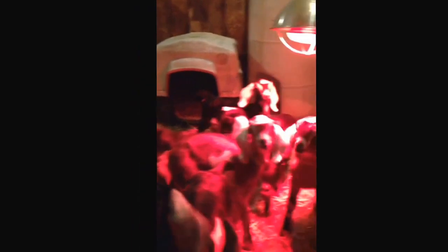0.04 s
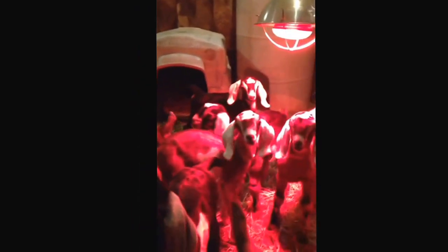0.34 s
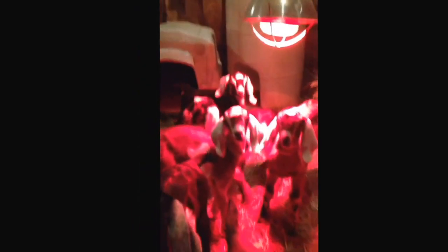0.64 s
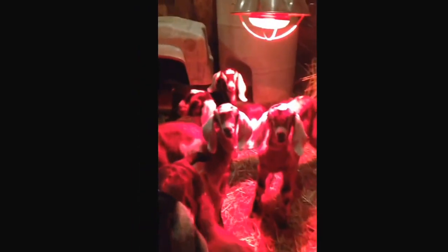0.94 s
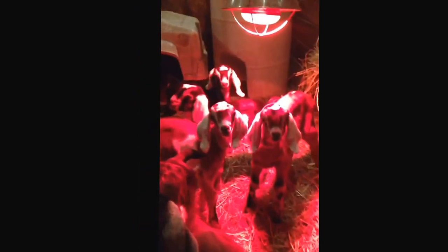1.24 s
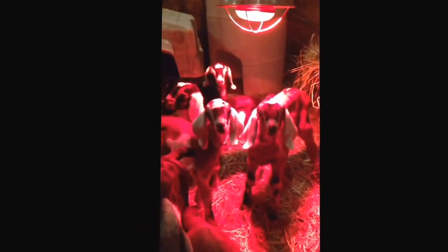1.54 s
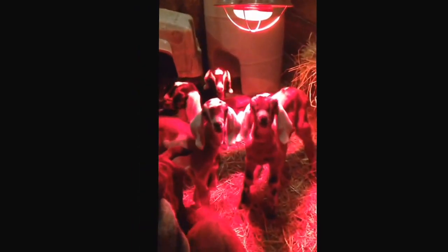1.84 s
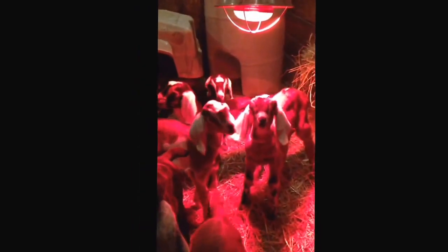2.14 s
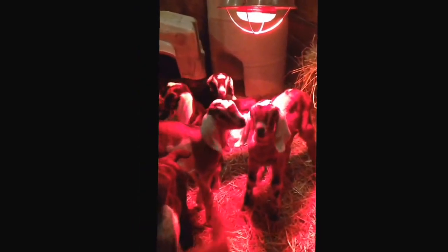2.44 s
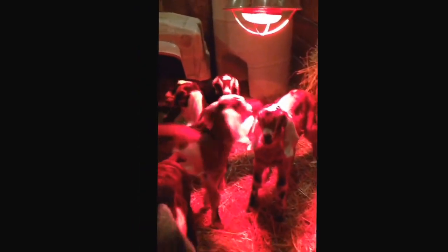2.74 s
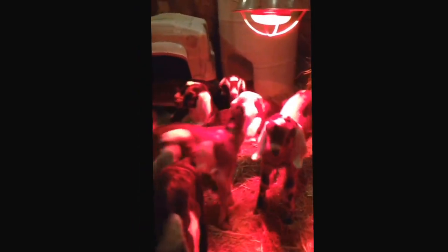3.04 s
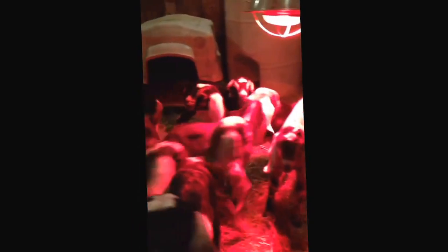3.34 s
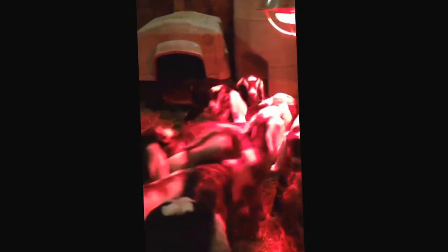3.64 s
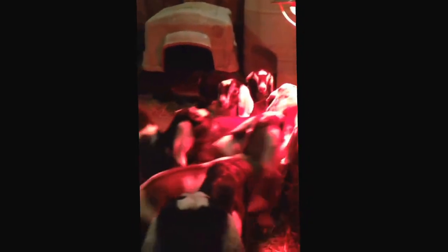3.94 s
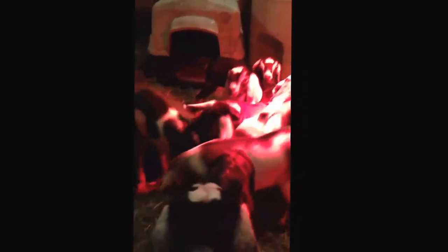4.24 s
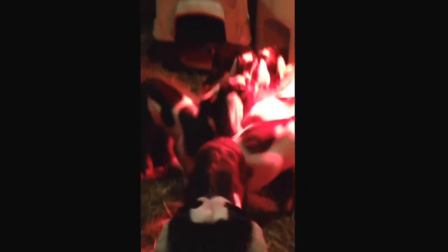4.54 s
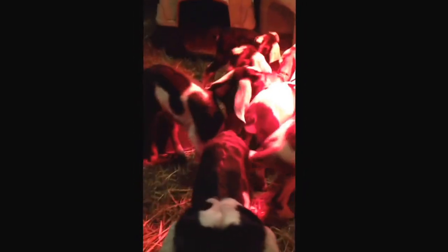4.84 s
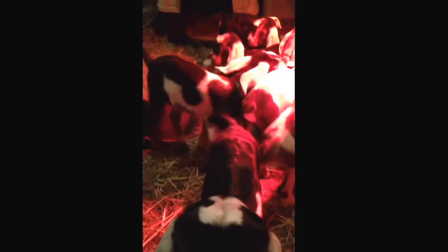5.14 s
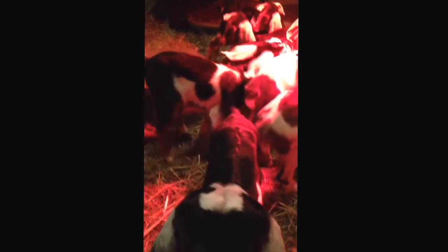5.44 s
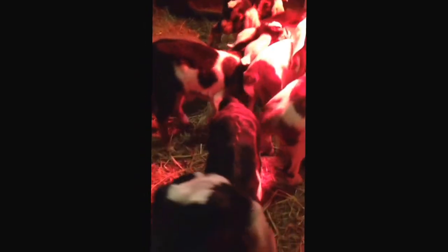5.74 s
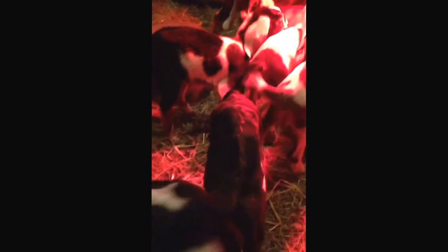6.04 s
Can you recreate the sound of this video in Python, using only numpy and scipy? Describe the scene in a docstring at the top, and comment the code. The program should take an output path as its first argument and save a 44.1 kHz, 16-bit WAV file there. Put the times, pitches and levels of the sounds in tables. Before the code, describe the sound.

After a brief knock, a young goat bleats close by, then another answers more quietly and hoarsely over faint straw rustle.

```python
"""Two goat kids bleat in a small wooden pen bedded with straw, one close by, then one further back.
By the source-filter principle, pulses of the vocal folds excite the resonances of throat and nose.
Each bleat is a chain of throbs in which the pitch sags, crests and drops while the mouth opens.
Knocks, ticks, low thuds and one soft grunt-like sound die away as damped resonances.
Soft steps fall at random, and the straw rustles over a low rumble."""
import sys
import numpy as np
from scipy import signal
from scipy.fft import rfft, irfft
from scipy.io import wavfile
from scipy.ndimage import uniform_filter1d

SR = 44100
rng = np.random.default_rng(int(sys.argv[2]) if len(sys.argv) > 2 else 0)


def dump_mix(stems):
    """Bounce the given channels to the path in sys.argv[1] as a 16-bit WAV at rate SR."""
    frames = np.atleast_2d(stems).T  # one column per channel
    limited = np.clip(frames, -1, 1)  # hard clip at full scale
    pcm = np.round(limited * 32767).astype(np.int16)
    wavfile.write(sys.argv[1], SR, pcm)


N = 268128

# Knocks, ticks and low thuds in the pen, and a soft low grunt-like sound near 4.7 s:
# start_s, level_db, pitch_hz, t60_s
PEN_SOUNDS = [ (0, -38, 175, 0.23), (.01, -48.5, 66, 0.71), (0, -31.5, 543, 0.19), (.038, -35.5, 785, 0.11),
              (.056, -38.5, 434, 0.22), (.087, -51, 122, 0.88), (1.835, -63.5, 400, 0.23),
              (2.828, -54.5, 1280, .025), (3.098, -55.5, 2104, 0.023), (3.509, -52.5, 100.7, 0.12),
              (3.735, -61, 340, 0.38), (3.877, -53, 324, 1), (3.881, -60, 1410, 0.54),
              (4.662, -49.5, 262.2, 0.22), (4.714, -52, 85.4, 0.18), (4.773, -53, 87, 0.162),
              (4.84, -54.5, 121, 0.99), (4.919, -61, 597, .12), (5.135, -54, 526, 0.17),
              (5.138, -52.5, 283, 0.55), (5.156, -52.5, 151, 0.36)]
# Noise spectra of crushed bedding, rumble and rustling straw: frequency_hz, relative_density_db
SCUFF_SPECTRUM = [(60, -10.5), (150, -1.5), (450, 1), (820, -3), (1150, -11), (2200, -16.5), (3500, -28.5),
                  (8000, -39.5), (15000, -53)]
RUMBLE_SPECTRUM = [(20, -20), (45, -3), (80, 0.5), (140, -6), (260, -10.5), (600, -15.5), (1500, -23),
                   (4000, -26.5), (8000, -27.5), (15000, -34)]
STRAW_SPECTRUM = [(530, -35.5), (900, -4.5), (1040, -3.5), (1590, -3), (2520, -1), (3520, -3), (5930, -2.5),
                  (13100, -4), (15300, -2.5)]
# Envelope of the rustle: time_s, relative_level_db
STRAW_ENVELOPE = [(0.0, -78.5), (0.13, -61), (0.17, -73), (0.52, -80), (0.66, -72.5), (1.47, -78),
                  (2.24, -76), (2.39, -89.5), (2.56, -71), (2.68, -81.5), (2.76, -67.5), (2.88, -76.5),
                  (3.74, -73), (3.77, -76.5), (4.42, -70), (4.47, -75.5), (5.86, -79), (6.08, -89)]
# Throbs of each bleat: centre_s, peak_db, fall_db, crest_hz, drop_hz, opening_fraction
NEAR_BLEAT = [ (0.742, -35.5, 18, 419, 395.5, 0.04), (0.842, -36.5, 5.5, 545.4, 495.7, .15),
              (.945, -35, 3.5, 567, 519.7, 0), (1.041, -18, 10.5, 579.5, 525.4, .95),
              (1.146, -20, 10, 580, 529.7, 0.8), (1.249, -21, 10, 589.2, 519, .85),
              (1.355, -21.5, 14, 579.2, 456, 0.8), (1.473, -22, 14, 572.7, 424.5, 0.8)]
FAR_BLEAT = [ (4.150, -49, 17, 515, 489.6, 0.068), (4.249, -43, 16, 540.5, 490, 0.095),
             (4.350, -41, 10.2, 537.2, 458.2, 0.025), (4.463, -35, 5.2, 547.2, 454.8, 0.34),
             (4.581, -35.5, 6.5, 567, 445.6, .75)]
# Pitch contour about a throb's centre: lead_in_s, sag_s, crest_s, crest_end_s, drop_s, drop_end_s
PITCH_OFFSETS = [-.040, -.020, .002, .010, .028, .043]
# Rasp contour about a throb's centre: start_s, full_s, easing_s, end_s
RASP_OFFSETS = [.004, .016, .03, .055]
# Level contour about a throb's centre: lead_in_s, peak_start_s, peak_end_s, trail_s, trough_s
LEVEL_OFFSETS = [-0.041, -0.0098, .013, 0.031, .052]
# Opening pitch scoop, timed from the first throb's centre: start_s, end_s
SCOOP_OFFSETS = [-.040, -.015]
# Formants of throat and nose: centre_hz, bandwidth_hz, shut_gain_db, open_gain_db
NEAR_FORMANTS = [(444.6, 430, 0.5, -5.5), (810, 230, -6.5, -27), (1073, 260, -8, 2), (1430, 310, -29, 3.5),
                 (1710, 330, -11.5, -5), (2260, 240, -8, 0), (2788, 85, -22, -24.5), (3455, 410, -11, -13),
                 (4477, 320, -25.5, -8), (5130, 670, -11, -11.5), (5720, 600, -27.5, -11.5),
                 (6400, 700, -48, -18.5), (7200, 770, -35.5, -20), (8770, 800, -39.5, -29),
                 (10135, 1000, -46.5, -35)]
FAR_FORMANTS = [(472.6, 200, 1, -12), (1030, 220, -0.5, 4.5), (1426, 390, -22.5, 2.5),
                (2280, 510, -18, -2.5), (2990, 230, -28.5, -11), (3380, 270, -11, -6),
                (3802, 360, -6.5, -21), (4360, 260, -10.5, 3), (5050, 570, -13, -19.5),
                (5573, 580, -20.5, -7.5), (6550, 750, -32.5, -16.5), (8650, 1400, -37.5, -28.5)]

TOP_HZ = 15400


def undb(db):
    """Amplitude ratio: a factor of ten for every 20 dB."""
    return np.exp(np.asarray(db) * (np.log(10) / 20))


def unit(x):
    """Normalisation to an rms of 1."""
    return x / np.sqrt(np.mean(x ** 2))


def decay(t, t60):
    """Exponential damping: 60 dB in t60 seconds."""
    return np.exp(-np.log(1000) * t / t60)


def curve(times, values, smooth_s=0.014):
    """Linear interpolation, its corners rounded by a moving average."""
    line = np.interp(np.arange(N) / SR, np.ravel(times), np.ravel(values))
    return uniform_filter1d(line, max(1, int(smooth_s * SR)))


def drift(rate_hz):
    """Random modulation of rms 1, interpolated between Gaussian values."""
    knots = rng.standard_normal(int(N / SR * rate_hz) + 2)
    return unit(np.interp(np.arange(N) / SR * rate_hz, np.arange(len(knots)), knots))


def frequencies(size=4096):
    """Fourier frequency grid on which filter gains are given."""
    return np.maximum(np.arange(size // 2 + 1) * SR / size, 1)


def shape(x, gain):
    """Minimum-phase filtering: folding the cepstrum makes the response causal."""
    cepstrum = irfft(np.log(gain + 1e-6))
    half = len(cepstrum) // 2
    cepstrum[1:half] *= 2
    cepstrum[half + 1:] = 0
    response = irfft(np.exp(rfft(cepstrum)))[:half]
    return signal.fftconvolve(x, response)[:len(x)]


def resonance(hz, width_hz):
    """Lorentzian gain curve of a resonance."""
    return 1 / (1 + (2 * (frequencies() - hz) / width_hz) ** 2)


def noise(spectrum):
    """Spectral shaping of white noise, scaled to rms 1."""
    hz, db = np.transpose(spectrum)
    gain = undb(np.interp(np.log(frequencies()), np.log(hz), db))
    return unit(shape(rng.standard_normal(N), gain))


def band(x, hz, kind, order=2):
    """Zero-phase low-pass or high-pass filtering."""
    return signal.sosfiltfilt(signal.butter(order, min(hz, .45 * SR), kind, fs=SR, output="sos"), x)


def damped_bursts(events, rise_s=0.0019, relative_width=0.47, scuff_hz=637):
    """Damped resonance: each knock, tick, thud or grunt-like sound is a noise band with a scuff."""
    out = np.zeros(N + SR)
    scuff = np.pad(noise(SCUFF_SPECTRUM) * undb(1.55 * drift(180)), (0, SR))
    t = np.arange(SR // 2) / SR
    for start_s, level_db, pitch_hz, t60_s in events:
        start = max(0, int(start_s * SR))
        span = slice(start, start + len(t))
        envelope = np.minimum(t / rise_s, 1) * decay(t, t60_s)
        ringing = shape(rng.standard_normal(SR), resonance(pitch_hz, relative_width * pitch_hz))
        burst = ringing[-len(t):] * envelope
        burst *= np.std(envelope) / np.std(burst)
        scuff_db = -4.5 - 3 * abs(np.log2(pitch_hz / scuff_hz))  # deep thuds and sharp ticks scuff least
        out[span] += undb(level_db) * (burst + undb(scuff_db) * envelope * scuff[span])
    return out[:N]


def soft_steps(count=18, loudest_db=-65, spread_db=6.5, centre_hz=230, t60_s=.25):
    """A random point process: soft hoof steps, as rows like those of PEN_SOUNDS."""
    when, softness, pitch = rng.random((count, 3)).T
    pitch_hz = centre_hz * 2 ** (2 * pitch - 1)
    return np.c_[when * (N - 1) / SR, loudest_db - spread_db * softness, pitch_hz, np.full(count, t60_s)]


def rumble(level_db=-68.5):
    """Low-frequency noise under slight amplitude modulation."""
    return noise(RUMBLE_SPECTRUM) * undb(level_db + 0.57 * drift(12))


def straw_rustle(gain_db=9.5, flicker_db=1.9):
    """Amplitude-modulated broadband noise: the hiss of the straw swells, sinks and flickers."""
    swell_db = curve(*np.transpose(STRAW_ENVELOPE)) + gain_db
    return noise(STRAW_SPECTRUM) * undb(swell_db + flicker_db * drift(300))


def throb_pitch(throbs, lead_in, sag, scoop, slack_hz=510.7):
    """Frequency modulation: each throb sags, crests and drops; the call scoops in from below."""
    centre_s, _, _, crest_hz, drop_hz, _ = np.transpose(throbs)
    end_hz = drop_hz * np.minimum(drop_hz / slack_hz, 1.02)  # slack folds keep sinking
    contour_hz = np.c_[np.outer(crest_hz, [lead_in, sag, 1, .993]), drop_hz, end_hz]
    pitch_hz = curve(centre_s[:, None] + PITCH_OFFSETS, contour_hz)
    return pitch_hz * curve(centre_s[0] + SCOOP_OFFSETS, [1 - scoop, 1])


def throb_rasp(throbs, hoarseness):
    """Loss of tension: the deeper the pitch drops, the slacker the folds and the harsher the throb."""
    centre_s, _, _, crest_hz, drop_hz, _ = np.transpose(throbs)
    slack = np.maximum(1 - drop_hz / crest_hz, 0) ** .8
    return curve(centre_s[:, None] + RASP_OFFSETS, np.outer(hoarseness * slack, [0, 1, 1, 0]))


def throb_level(throbs, least_swell_db, period_s=0.1, fade_db_per_s=452.5, onset_db=-56.5, dip_db=2):
    """Amplitude modulation in dB: the later a throb comes, the further the voice has faded."""
    centre_s, peak_db, fall_db = np.transpose(throbs)[:3]
    trail_db = peak_db - fall_db
    faded_db = trail_db[:-1] - fade_db_per_s * (np.diff(centre_s) - period_s)
    lead_db = np.minimum(np.r_[onset_db, faded_db], peak_db - least_swell_db)
    trough_db = np.minimum(trail_db, np.r_[lead_db[1:], onset_db]) - dip_db
    times = np.ravel(centre_s[:, None] + LEVEL_OFFSETS)
    levels = np.c_[lead_db, peak_db, peak_db, trail_db, trough_db].ravel()
    return curve(np.r_[centre_s[0] - .06, times, centre_s[-1] + .09], np.r_[-120, levels, -120])


def larynx(pitch_hz, rasp, jitter, rasp_jitter, flutter_db, blur_rad, air, rasp_air, air_hz):
    """Glottal source: harmonic pulses with a puff of air each cycle; slack folds beat unevenly."""
    wobble = (jitter + rasp_jitter * rasp ** 2) * drift(450)
    phase = 2 * np.pi * np.cumsum(pitch_hz * (1 + wobble)) / SR
    pulses = 0
    for k in range(1, 25):
        unrest = min(k / 7, 1)  # the changing pulse shape disturbs the upper partials most
        partial = np.cos(k * phase + blur_rad * unrest * drift(30)) * (k * pitch_hz < TOP_HZ)
        pulses += partial * undb(flutter_db * unrest * drift(110))
    puffs = (1 + np.cos(phase)) * band(rng.standard_normal(N), air_hz, "high", order=1)
    return unit(pulses) + (air + rasp_air * rasp) * unit(puffs)


def vocal_tract(source, rasp, throbs, formants, gape=1.5):
    """Formant filtering: the opening mouth turns a nasal hum into a bright vowel, and gapes in a rasp."""
    centre_s, *_, mouth = np.transpose(throbs)
    hum = shape(source, sum(undb(db) * resonance(hz, width) for hz, width, db, _ in formants))
    vowel = shape(source, sum(undb(db) * resonance(hz, width) for hz, width, _, db in formants))
    opening = curve(centre_s[:, None] + [-.011, .052], np.repeat(mouth, 2))
    opening = np.clip(opening * (1 + gape * rasp), 0, 1)
    return (1 - opening) * hum + opening * vowel


def voice_colour(voice, throbs, brighten_db_per_s, pinch_treble_db, pinch_bass_db):
    """Spectral tilt at constant power: the call brightens as it goes and is pinched between throbs."""
    centre_s = np.transpose(throbs)[0]
    pinch_times = np.ravel(centre_s[:, None] + [-.04, 0, .034])
    pinch = curve(pinch_times[1:], np.tile([1, 0, 1], len(centre_s))[1:], smooth_s=0.017)
    brighten_db = curve(centre_s, brighten_db_per_s * (centre_s - centre_s.mean()))
    treble_change = (undb(brighten_db + pinch_treble_db * pinch) - 1) * band(voice, 1800, "high")
    bass_change = (undb(pinch_bass_db * pinch) - 1) * band(voice, 600, "low", order=4)
    voice = voice + treble_change + bass_change
    power = uniform_filter1d(uniform_filter1d(voice ** 2, SR // 200), SR // 200)
    return voice / np.sqrt(power)


def near_kid():
    """Source-filter voicing with nearly periodic folds: a firm, clear bleat rising from a low hum."""
    pitch_hz = throb_pitch(NEAR_BLEAT, lead_in=1.005, sag=0.95, scoop=.24)
    rasp = throb_rasp(NEAR_BLEAT, hoarseness=1.85)
    source = larynx(pitch_hz, rasp, jitter=0.0056, rasp_jitter=.04, flutter_db=1.83, blur_rad=.3,
                    air=.08, rasp_air=.35, air_hz=1700)
    voice = vocal_tract(source, rasp, NEAR_BLEAT, NEAR_FORMANTS)
    voice = voice_colour(voice, NEAR_BLEAT, brighten_db_per_s=5.5, pinch_treble_db=8, pinch_bass_db=-5)
    return voice * undb(throb_level(NEAR_BLEAT, least_swell_db=9))


def pen(x, early_db, tail_db, beam_hz=1500, early_t60_s=.095, low_t60_s=0.42, high_t60_s=0.15):
    """Reflection and absorption: quick echoes off the boards, then a tail whose treble straw soaks up."""
    t = np.arange(SR // 2) / SR
    early, late = rng.standard_normal((2, len(t)))
    # the mouth beams its treble at the boards
    early = band(early, beam_hz, "high", order=1) * decay(t, early_t60_s) * (t > .003)
    low_tail = band(late, 3000, "low") * decay(t, low_t60_s)
    high_tail = 0.4 * band(late, 2400, "high") * decay(t, high_t60_s)
    tail = (low_tail + high_tail) * (t > .01)
    response = (undb(early_db) * unit(early) + undb(tail_db) * unit(tail)) / np.sqrt(len(t))
    return x + signal.fftconvolve(x, response)[:N]


def far_kid():
    """Source-filter voicing with irregular folds: a hoarser bleat, each throb sliding from above."""
    pitch_hz = throb_pitch(FAR_BLEAT, lead_in=1.15, sag=1.01, scoop=.04)
    rasp = throb_rasp(FAR_BLEAT, hoarseness=3.9)
    source = larynx(pitch_hz, rasp, jitter=.007, rasp_jitter=.11, flutter_db=4.0, blur_rad=1.1,
                    air=.15, rasp_air=0.94, air_hz=750)
    voice = vocal_tract(source, rasp, FAR_BLEAT, FAR_FORMANTS)
    voice = voice_colour(voice, FAR_BLEAT, brighten_db_per_s=8.5,
                         pinch_treble_db=-1.6, pinch_bass_db=-2.5)
    return voice * undb(throb_level(FAR_BLEAT, least_swell_db=19.5))


def scene():
    """Superposition of all sources in one channel; the further kid is the more reverberant."""
    near = pen(near_kid(), early_db=-10.5, tail_db=-30.0)
    far = pen(far_kid(), early_db=-9.5, tail_db=-21.0)
    bursts = damped_bursts(np.r_[PEN_SOUNDS, soft_steps()])
    return (near + far + bursts + rumble() + straw_rustle())[None]


def record(dry):
    """Band limiting: the microphone loses the deepest bass and cuts the top."""
    thin = signal.sosfilt(signal.butter(2, 35, "high", fs=SR, output="sos"), dry)
    return signal.sosfilt(signal.ellip(12, .1, 80, TOP_HZ, fs=SR, output="sos"), thin)


dry = scene()
out = record(dry)
dump_mix(out)
```